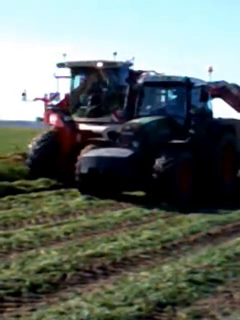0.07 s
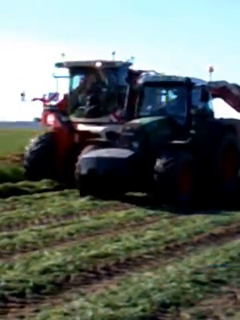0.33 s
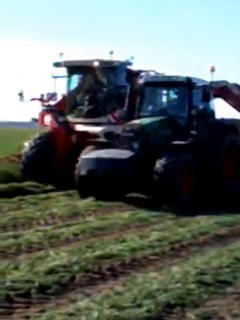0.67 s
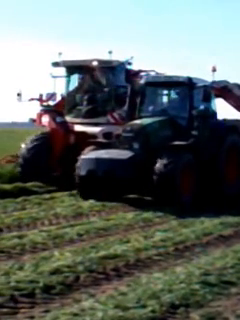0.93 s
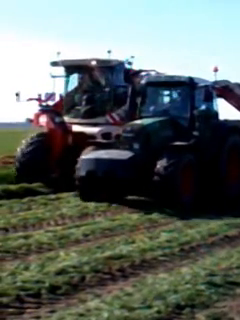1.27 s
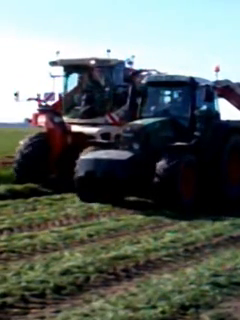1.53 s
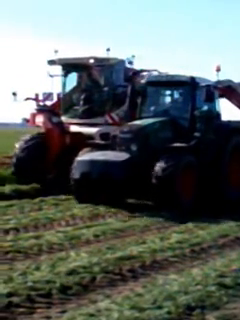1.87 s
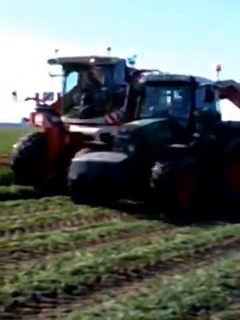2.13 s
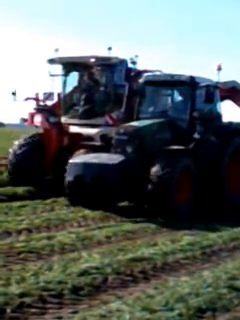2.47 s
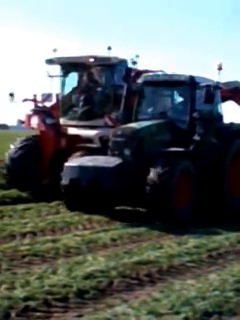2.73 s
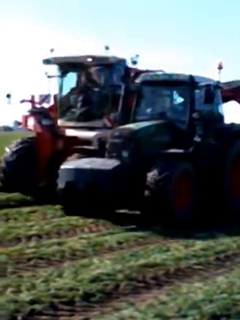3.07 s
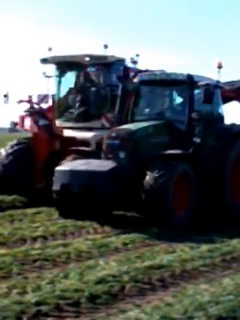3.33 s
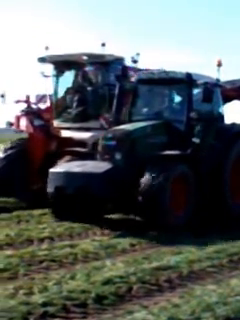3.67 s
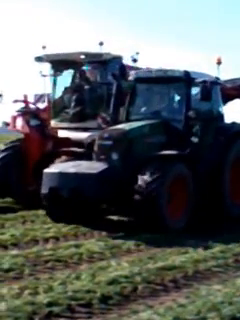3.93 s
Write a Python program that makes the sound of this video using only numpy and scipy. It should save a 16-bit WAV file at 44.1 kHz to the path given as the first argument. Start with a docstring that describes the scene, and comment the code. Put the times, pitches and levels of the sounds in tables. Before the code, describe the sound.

A tractor and a harvesting machine rumble closer, their engine roar growing loud and throbbing.

```python
"""In an open field a tractor and a forage harvester approach side by side in a light wind.
Two six-cylinder diesels drone at multiples of their crankshaft speeds, over the broad noise of combustion.
The harvester's drive whines and wads of grass thud through its chopper. The tractor's panels clatter
at their resonances, and its roar swells and throbs as it nears. A few sharp clicks lie on top."""
import sys
import numpy as np
from scipy.fft import rfft, irfft, next_fast_len
from scipy.io import wavfile
from scipy.ndimage import map_coordinates

SR = 44100
rng = np.random.default_rng(int(sys.argv[2]) if len(sys.argv) > 2 else 0)


def materialize(psi):
    """Save the field psi as 16-bit PCM at rate SR to the path in sys.argv[1].

    A 1-D psi becomes a single channel; in a 2-D psi each row is a channel.
    """
    bounded = np.clip(np.atleast_2d(psi).T, -1, 1)
    quanta = np.round(bounded * 32767).astype(np.int16)
    wavfile.write(sys.argv[1], SR, quanta)


N = 176400
T = np.arange(N) / SR


def amp(db):
    """Decibels to amplitude ratio."""
    return 10 ** (np.asarray(db) / 20)


def unit(x):
    """Normalisation to rms 1."""
    return x / np.sqrt(np.mean(x ** 2) + 1e-20)


def curve(rows):
    """Linear interpolation of (time_s, value) rows at every sample."""
    return np.interp(T, *np.transpose(rows))


def wobble(rate_hz):
    """Smooth random modulation: a spline through rate_hz Gaussian values a second."""
    return map_coordinates(rng.standard_normal(int(N * rate_hz / SR) + 4), [T * rate_hz])


def swell(peak_s, half_width_s):
    """Gaussian envelope, down to 1/e at half_width_s from its peak."""
    return np.exp(-((T - peak_s) / half_width_s) ** 2)


def filtered(x, response):
    """Linear filtering: the spectrum of x times a frequency response."""
    size = next_fast_len(N + SR // 2)
    return irfft(rfft(x, size) * response(np.fft.rfftfreq(size, 1 / SR)), size)[:N]


def coloured(x, spectrum):
    """Spectral shaping by (frequency_hz, relative_db) rows on a log axis, to rms 1."""
    hz, db = np.transpose(spectrum)
    return unit(filtered(x, lambda f: amp(np.interp(np.log(f + 1), np.log(hz + 1), db))))


def turns(hz, drift=.002):
    """Phase in turns: the integral of a slightly drifting frequency."""
    return np.cumsum(hz * (1 + drift * wobble(3))) / SR


def engine_tones(shaft, orders):
    """Engine orders: sinusoids locked to the crankshaft, the higher ones wavering more in level."""
    out = np.zeros(N)
    for order, db in orders:
        phase = order * shaft + rng.random()
        out += amp(db + 0.2 * order * wobble(5)) * np.sin(2 * np.pi * phase)
    return out


def combustion(shaft, periodic_share):
    """Cyclic noise: a pattern recurring every two turns plus turbulence, modulated by six firings."""
    points = 3300
    cycle = map_coordinates(rng.standard_normal(points), [(shaft / 2) % 1 * points], mode='grid-wrap')
    periodic = np.sqrt(periodic_share) * unit(cycle)
    turbulence = np.sqrt(1 - periodic_share) * rng.standard_normal(N)
    firing = np.cos(2 * np.pi * 3 * shaft)
    return (periodic + turbulence) * (1 + .08 * firing)


def harvester():
    """Superposition of exhaust orders, a drive's whine and combustion noise shaped by the body."""
    # exhaust drone: order, level_db
    drone_orders = [(3, -38), (12, -41.5), (13, -44), (18, -40), (22.5, -37), (27, -41)]
    # diesel hum: order, relative_db
    hum_orders = [(6, -2.5), (9, -1.5)]
    # swelling and fading of the hum: time_s, level_db
    hum_levels = [(0, -32.5), (.45, -38), (.58, -47), (1, -43.5), (1.4, -33.5), (1.8, -35), (2.05, -39),
                  (2.8, -44), (2.98, -33.5), (3.2, -34), (3.6, -44.5), (3.88, -34.5), (4, -36)]
    # body noise: frequency_hz, relative_db
    body_spectrum = [(60, -50), (108, -38.5), (135, -19.5), (160, -18), (190, -17), (240, -7.5),
                     (290, -8.5), (370, -5), (440, -5.5), (600, -5), (790, -5.5), (880, -10), (1030, -3),
                     (1220, -8), (1500, -13.5), (1850, -20.5), (2150, -22), (2500, -26), (4400, -36.5),
                     (5200, -44.5), (7400, -50.5)]
    # rise and fall of the body noise below the crossover: time_s, gain_db
    bass_gains = [(0, 3), (.4, -2), (.55, -1.5), (1.05, 0.5), (1.3, -4.5), (1.8, 1.5), (4, 2)]
    crank_hz, whine_hz, crossover_hz = 26.95, 1167.5, 400
    shaft = turns(crank_hz)
    drone = engine_tones(shaft, drone_orders)
    hum = amp(curve(hum_levels)) * engine_tones(shaft, hum_orders)
    whine = amp(-33.5 + 1.9 * wobble(6.9)) * np.sin(2 * np.pi * turns(whine_hz))
    body = coloured(combustion(shaft, periodic_share=.27), body_spectrum)
    bass = filtered(body, lambda f: 1 / (1 + (f / crossover_hz) ** 6))
    body = body - bass + amp(curve(bass_gains)) * bass
    return np.sqrt(2) * (drone + hum + whine) + amp(-20.5 + 0.66 * wobble(14)) * body


def exhaust_boom(shaft):
    """Pipe resonance favours certain engine orders; each flutters in amplitude and phase."""
    # favoured orders: order, relative_db
    orders = [(8.5, -22.5), (12.5, -25), (21, -17), (22, -15), (24.5, -13.5), (25.5, -13.5), (32, -16)]
    flutter_hz, flutter_depth = 24, 1.6
    out = np.zeros(N)
    for order, db in orders:
        flutter = 1 + flutter_depth * (wobble(flutter_hz) + 1j * wobble(flutter_hz))
        carrier = np.exp(2j * np.pi * (order * shaft + rng.random()))
        out += amp(db) * unit(np.real(flutter * carrier))
    return out


def panel_clatter(crank_hz):
    """Forced vibration: noise that surges once a turn drives the modes of the engine panels."""
    # panel modes: pitch_hz, bandwidth_hz, relative_db
    modes = [(2050, 100, 3.5), (2213, 81, 3), (2757, 44, 1), (2939, 130, -0.5), (3490, 48, -5),
             (3680, 75, -9), (4117, 140, -6.5), (4605, 170, -9.5), (5675, 380, -16), (6350, 620, -19)]

    def response(f):
        """Sum of damped resonators of alternating sign."""
        return sum((-1) ** k * amp(db) * 1j * f * width / (hz * hz - f * f + 1j * f * width)
                   for k, (hz, width, db) in enumerate(modes))

    first_peak_s = .0335
    surge = np.cos(2 * np.pi * crank_hz * (T - first_peak_s))
    force = rng.standard_normal(N) * np.exp(.38 * surge + .18 * wobble(320))  # with a fast rattle
    return unit(filtered(force, response))


def tractor():
    """Level rises as distance shrinks: the engine's roar grows over a steady panel clatter."""
    # body noise: frequency_hz, relative_db
    body_spectrum = [(110, -51.5), (185, -20), (222, -3.5), (255, -12.5), (285, -8), (420, -14.5),
                     (510, -2.5), (575, 0), (630, -2), (675, -2.5), (850, -0.5), (910, -3.5), (1060, -2),
                     (1130, -11), (1400, -9.5), (1850, -21), (2130, -19.5), (2500, -29), (4400, -41),
                     (5200, -53), (7300, -65.5)]
    # roar on the approach: time_s, level_db
    roar_levels = [(0, -29.5), (1.55, -30), (1.8, -19.5), (2.02, -19), (2.13, -16), (2.5, -14.5),
                   (3.3, -15.5), (3.75, -13.5), (4, -13.5)]
    crank_hz = 26.58
    shaft = turns(crank_hz)
    body = coloured(combustion(shaft, periodic_share=.2), body_spectrum)
    roar = unit(body + exhaust_boom(shaft))
    clatter = amp(-38.5) * panel_clatter(crank_hz)
    return amp(curve(roar_levels) + 0.33 * wobble(16)) * roar + clatter


def wind():
    """Turbulent pressure on the microphone makes a soft, uneven rumble."""
    # gusts: time_s, level_db
    gusts = [(0, -42.5), (.65, -45), (1.15, -39.5), (1.35, -43), (1.75, -40.5), (2.25, -37.5), (2.65, -45),
             (4, -48)]
    # rumble: frequency_hz, relative_db
    spectrum = [(5, -27), (20, 2), (42, 2.5), (65, -4), (95, -27.5), (200, -59.5)]
    return amp(curve(gusts) + 1.2 * wobble(12)) * coloured(rng.standard_normal(N), spectrum)


def chopper():
    """Amplitude-modulated noise: each wad of grass passes as a low thud and a higher rasp."""
    # wads of grass: peak_s, half_width_s, thud_db, rasp_db
    wads = [(0.035, 0.039, -25, -44), (0.146, 0.021, -20.5, -19.5), (0.279, 0.025, -24, -15.5),
            (0.403, 0.083, -26.5, -23.5), (0.613, 0.028, -41, -20.5), (1.167, 0.018, -15.5, -24),
            (1.216, 0.024, -13.5, -21), (1.328, 0.024, -18.5, -18), (1.439, 0.026, -20, -24),
            (1.638, 0.09, -27.5, -30), (1.893, 0.11, -23.5, -35), (2.124, 0.033, -32, -15.5),
            (2.284, 0.042, -17, -17), (2.864, 0.055, -22.5, -21.5), (3.166, 0.024, -21, -28.5),
            (3.483, 0.011, -30, -13), (3.978, .06, -24, -29)]
    # thud: frequency_hz, relative_db
    thud_spectrum = [(110, -50.5), (150, -18.5), (200, -6.5), (330, -5), (480, -0.5), (800, -12.5),
                     (3000, -55)]
    # rasp: frequency_hz, relative_db
    rasp_spectrum = [(250, -17.5), (550, -5), (800, 5), (1150, -7), (1700, -16), (5000, -47.5)]
    thud = coloured(rng.standard_normal(N), thud_spectrum)
    rasp = coloured(rng.standard_normal(N), rasp_spectrum)
    out = np.zeros(N)
    for peak_s, half_width_s, thud_db, rasp_db in wads:
        out += swell(peak_s, half_width_s) * (amp(thud_db) * thud + amp(rasp_db) * rasp)
    return out


def ticks():
    """An impulse has a flat spectrum and is heard as a dry tick."""
    # evenly spaced impulses: start_s, level_db
    impulses = [(.4145, -14), (1.3545, -3.5), (2.2945, -17), (3.2345, -14)]
    out = np.zeros(N)
    for start_s, db in impulses:
        out[round(start_s * SR)] += amp(db)
    return out


def damped_mode(t, hz, db, t60_s):
    """Free vibration: a sinusoid that decays by 60 dB in t60_s."""
    return np.sin(2 * np.pi * hz * t) * amp(db - 60 * t / t60_s)


def knocks():
    """Impacts, as of stones on steel, excite damped modes: a dull body, a ring and a bright crack."""
    # impacts: start_s, body_hz, body_db, ring_hz, ring_db, crack_db
    impacts = [(1.1635, 380, -7, 2100, -35, -40), (1.2195, 480, 0, 2100, -30, -35),
               (3.7625, 1300, 1, 4000, -9, 1), (3.7826, 680, 0, 4550, -15, -15),
               (3.9918, 740, 5, 3300, -8, -1)]
    # modes of every crack: pitch_hz, relative_db, t60_s
    crack_modes = [(1850, -2, .007), (2400, -10, .005), (3200, -13, .005), (5900, -17, .004)]
    attack_s = .00015
    out = np.zeros(N)
    for start_s, body_hz, body_db, ring_hz, ring_db, crack_db in impacts:
        t = np.maximum(T - start_s, 0)
        body = damped_mode(t, body_hz, body_db, t60_s=.01) * (1 - np.exp(-2 * body_hz * t))
        ring = damped_mode(t, ring_hz, ring_db, t60_s=.006)
        crack = sum(damped_mode(t, hz, db + crack_db, t60_s) for hz, db, t60_s in crack_modes)
        out += body + (ring + crack) * (1 - np.exp(-t / attack_s))
    return out


def exhaust_throbs():
    """Resonances of the tractor's exhaust swell one after another as brief tones."""
    # throbs: peak_s, half_width_s, pitch_hz, level_db
    throbs = [(2.533, 0.034, 822, -21.5), (2.66, 0.032, 745, -21), (2.86, 0.042, 560, -18),
              (2.935, .03, 572, -18), (3.068, 0.04, 694, -20), (3.25, .04, 558, -18.5),
              (3.387, 0.06, 564, -18), (3.467, 0.03, 680, -20), (3.637, .04, 645, -21),
              (3.73, 0.04, 580, -15.5), (3.87, .035, 645, -20), (3.887, 0.027, 842, -18),
              (3.91, 0.038, 569, -17.5)]
    out = np.zeros(N)
    for peak_s, half_width_s, hz, db in throbs:
        out += amp(db) * swell(peak_s, half_width_s) * np.sin(2 * np.pi * (hz * T + rng.random()))
    return np.sqrt(2) * out


def scrape():
    """Friction noise: one short, light hiss."""
    # hiss: frequency_hz, relative_db
    spectrum = [(1500, -17), (3200, 4), (5800, -9), (7500, -20)]
    hiss = coloured(rng.standard_normal(N), spectrum)
    return amp(-37) * swell(peak_s=3.597, half_width_s=.025) * hiss


def scene():
    """Sound pressures add in the open field; the machines' noise falls steeply above 7.1 kHz."""
    machines = harvester() + tractor() + exhaust_throbs() + chopper() + scrape()
    machines = filtered(machines, lambda f: 1 / np.sqrt(1 + (f / 7100) ** 60))
    return (machines + wind() + ticks() + knocks())[None]


def record(dry):
    """Hard clipping limits the highest peaks, and a steep low-pass ends the band at 7.9 kHz."""
    clipped = np.clip(dry[0], -1, 1)
    return filtered(clipped, lambda f: 1 / np.sqrt(1 + (f / 7900) ** 90))[None]


dry = scene()
out = record(dry)
materialize(out)
```